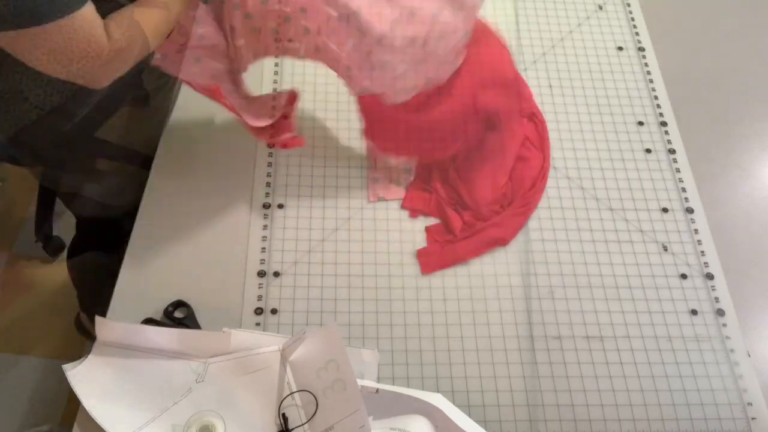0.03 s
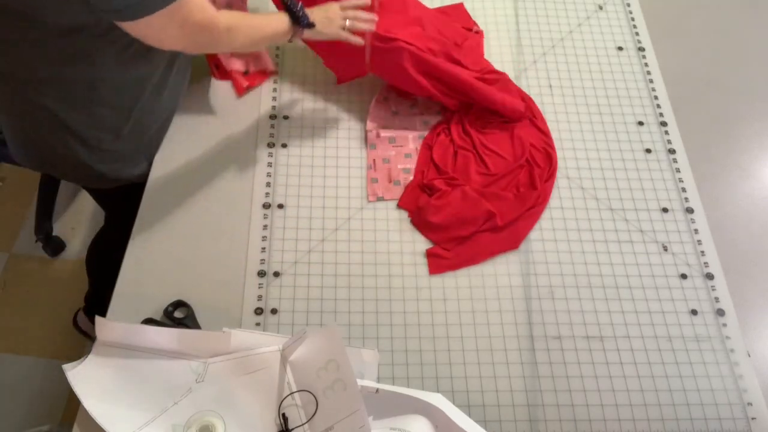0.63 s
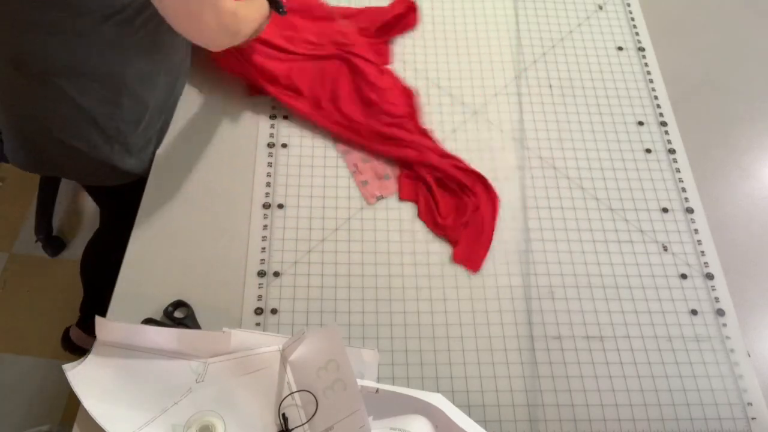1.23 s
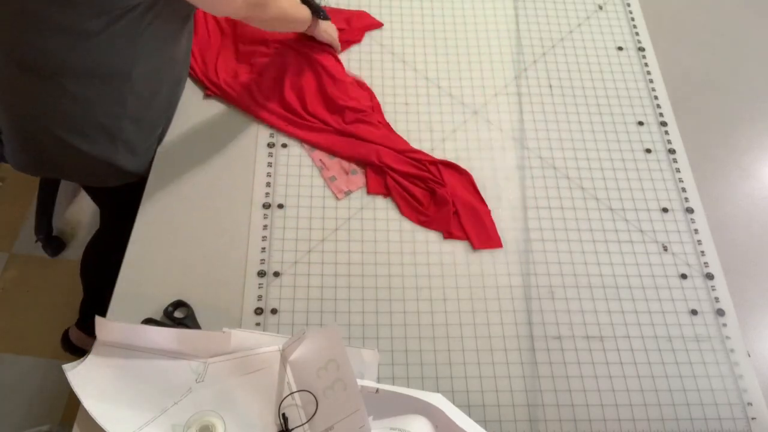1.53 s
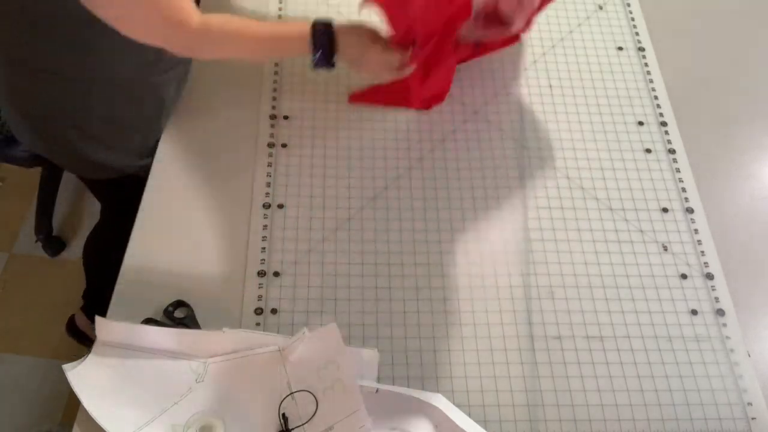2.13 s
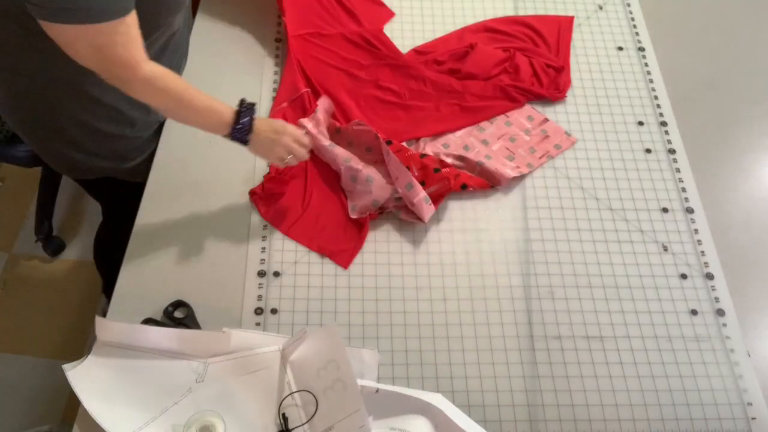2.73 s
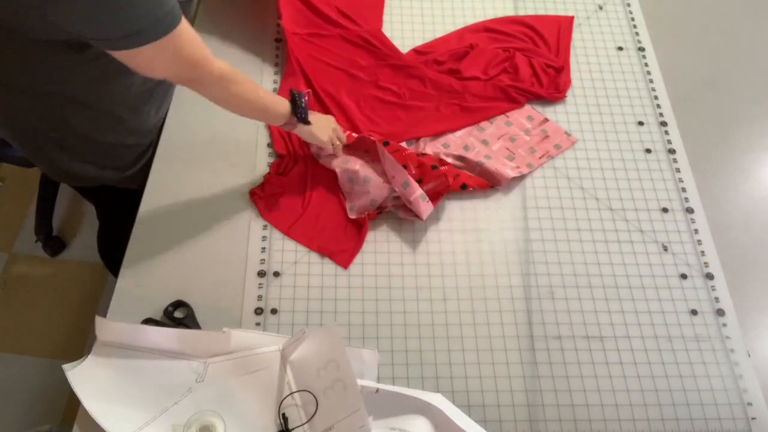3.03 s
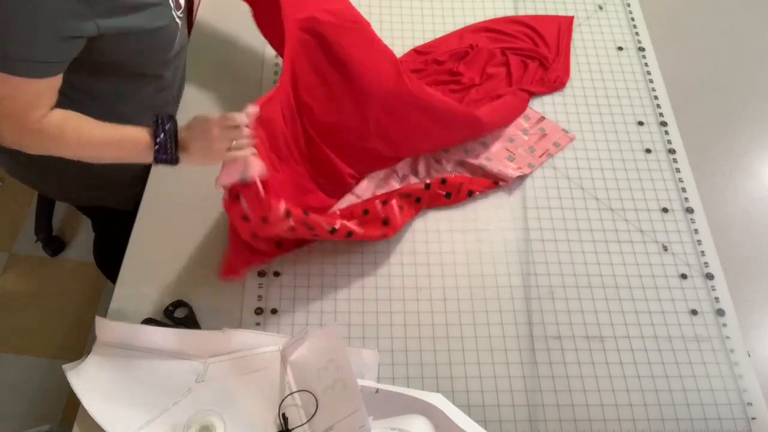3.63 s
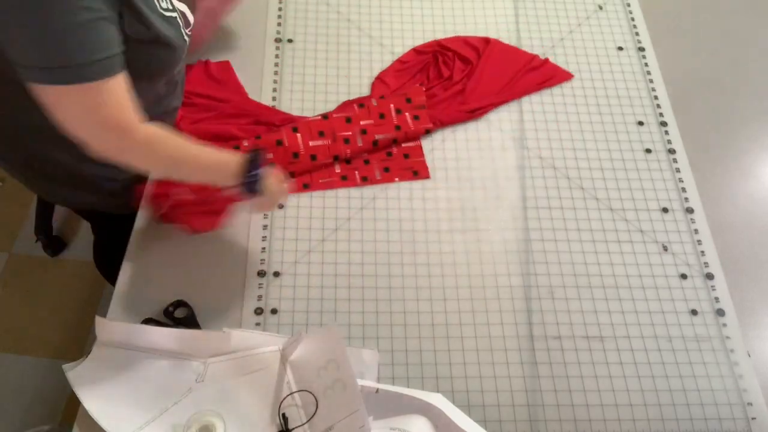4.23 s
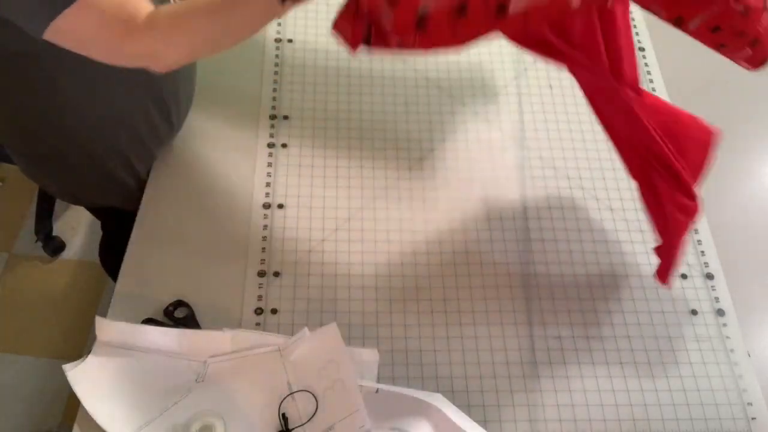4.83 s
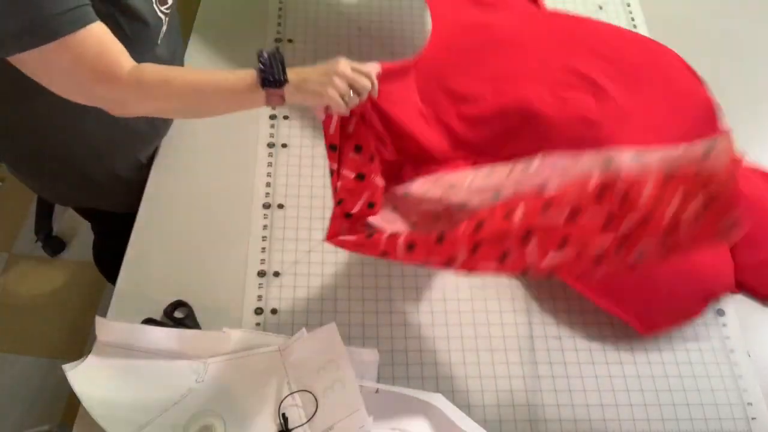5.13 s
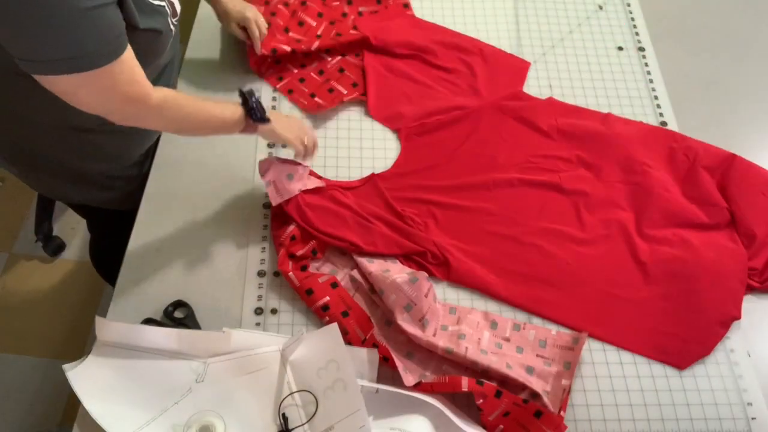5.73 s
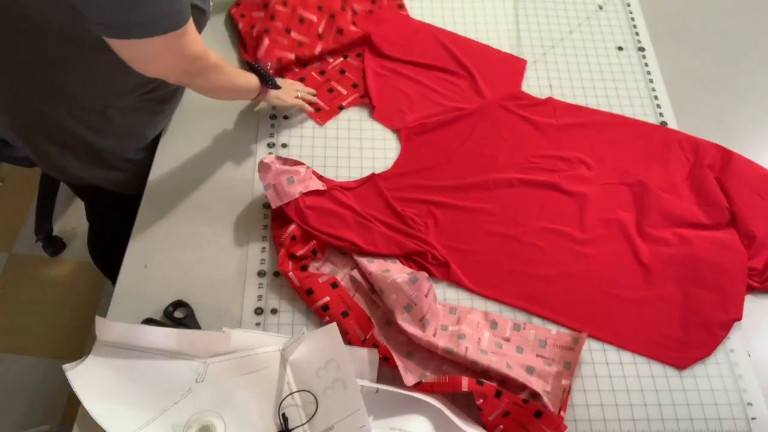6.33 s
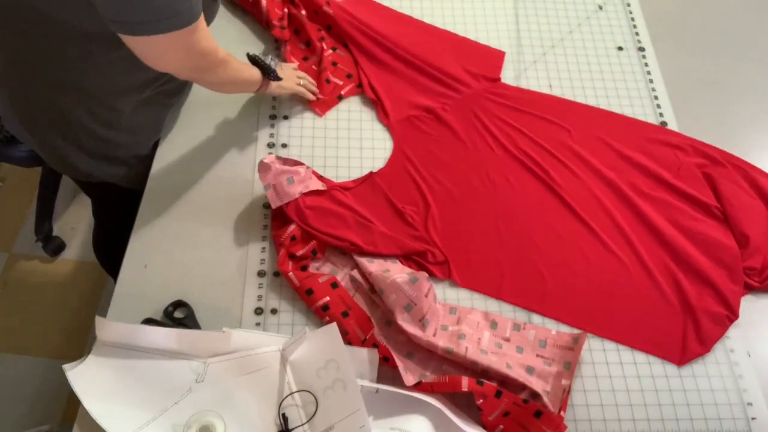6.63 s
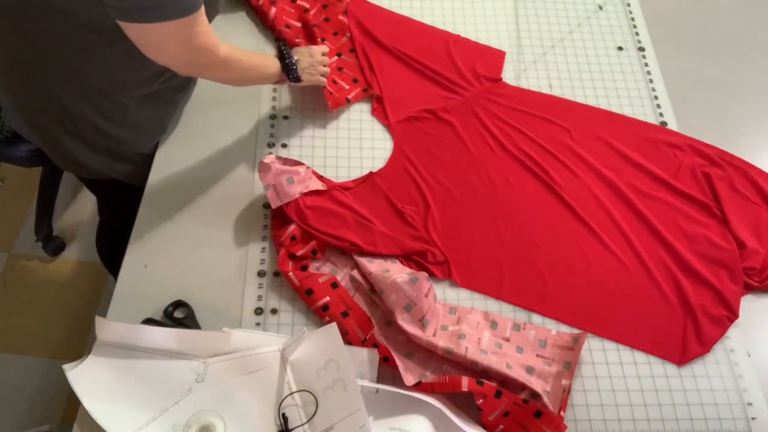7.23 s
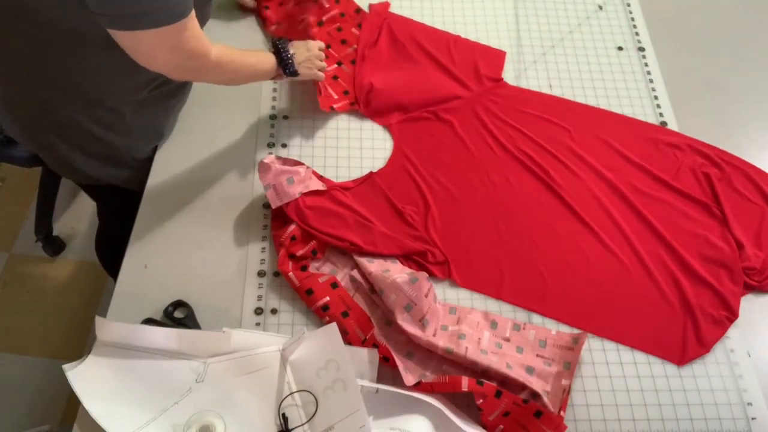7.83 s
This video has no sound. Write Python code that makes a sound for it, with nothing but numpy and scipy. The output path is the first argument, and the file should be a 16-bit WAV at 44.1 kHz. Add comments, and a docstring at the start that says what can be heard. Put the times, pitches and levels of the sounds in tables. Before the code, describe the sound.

Soft fabric is dragged over a table, shaken out with whip-like snaps and smoothed by hand, with light knocks over a low room hum.

```python
"""In a small humming workroom, a soft dress is dragged over a cutting table, lifted, shaken out twice
and smoothed by hand. Fingers scuff the mat and knock the table top, and the walls answer softly.
The weave hisses as its threads catch and slip, loose folds flutter and slap, and the hem cracks
like a whip when it is pulled tight. The moving air pushes on one close microphone."""
import sys
import numpy as np
from scipy import signal
from scipy.fft import rfft, irfft, next_fast_len
from scipy.io import wavfile
from scipy.ndimage import map_coordinates

SR = 44100
rng = np.random.default_rng(int(sys.argv[2]) if len(sys.argv) > 2 else 0)


def inscribe(sig):
    """Save sig as 16-bit PCM at rate SR to the path in sys.argv[1].

    A 1-D sig is mono; a 2-D sig holds one channel per row.
    Samples are clipped to [-1, 1] before scaling.
    """
    pcm = np.round(np.clip(np.atleast_2d(sig).T, -1, 1) * 32767)
    wavfile.write(sys.argv[1], SR, pcm.astype(np.int16))


N = 348390  # 7.9 s
TOP_HZ = 15850


def amp(db):
    """Turn decibels into a gain to multiply by."""
    return 10 ** (np.asarray(db) / 20)


def unit(x):
    """Scale a sound to an average (rms) size of 1."""
    return x / np.sqrt(np.mean(x ** 2) + 1e-20)


def along(points, hz):
    """Read between (f/Hz, value) points, spaced as musical pitch."""
    f, values = np.transpose(points)
    return np.interp(np.log(hz + 1), np.log(f + 1), values)


def wobble(rate):
    """A smooth random curve through rate points a second."""
    points = rng.standard_normal(int(N * rate / SR) + 4)
    return map_coordinates(points, [np.arange(N) * rate / SR])


def filtered(x, response):
    """Multiply each frequency in x by response(hz)."""
    size = next_fast_len(len(x) + 8192)
    return irfft(rfft(x, size) * response(np.fft.rfftfreq(size, 1 / SR)), size)[:len(x)]


def coloured(x, spectrum):
    """Give x a tone colour from (f/Hz, level/dB) points, at an average size of 1."""
    return unit(filtered(x, lambda hz: amp(along(spectrum, hz))))


def band(hz, centre_hz, octaves):
    """A bell-shaped filter that keeps the pitches near centre_hz."""
    return np.exp(-.5 * (np.log2((hz + 1) / centre_hz) / octaves) ** 2)


def resonances(modes, hz):
    """A filter for something that rings at the given (f/Hz, width/Hz, level/dB) rows."""
    return sum(amp(db) * 1j * hz * width / (centre ** 2 - hz ** 2 + 1j * hz * width)
               for centre, width, db in modes)


def slips(size, rate, spread_db, smooth):
    """Tiny uneven clicks, about rate a second, mixed with a share of smooth hiss."""
    chance, strength, sign = rng.random(size), rng.standard_normal(size), rng.standard_normal(size)
    clicks = (chance < rate / SR) * np.sign(sign) * amp(spread_db * np.clip(strength, -2, 2))
    return unit(unit(clicks) + smooth * rng.standard_normal(size))


def fade(t, t60):
    """Die away by 60 dB in t60 seconds, the "fade" time in the tables."""
    return np.exp(-np.log(1000) * t / t60)


def burst(t, rise, t60):
    """Swell quickly to a peak of 1, then die away."""
    shape = (1 - np.exp(-t / rise)) * fade(t, t60)
    return shape / shape.max()


def moves(rows, skew=0.67, speed_power=1.08):
    """One gain curve per level column: the faster the arm moves, the louder the cloth."""
    start, length, *levels = np.transpose(rows)[:, :, None]
    progress = np.clip((np.arange(N) / SR - start) / length, 0, 1)
    speed = np.abs(np.sin(np.pi * progress ** skew))  # fastest before the middle of the move
    return [np.linalg.norm(amp(db) * speed ** speed_power, axis=0) for db in levels]


# Tone colours of the ventilation and of a bright hiss (also used for the weave): f/Hz, level/dB
VENT_COLOUR = [(20, 5.5), (42, 3.5), (75, -13.5), (130, -16.5), (260, -25.5), (450, -28), (680, -30),
               (850, -38.5), (1500, -37), (7000, -48), (10000, -54), (15800, -52)]
HISS_COLOUR = [(1500, -18), (3200, 0.5), (4500, 1.5), (5700, 1), (7300, 2.5), (10500, -0.5), (12500, -4),
               (15800, -12)]
def ventilation(hum_db=-48.5, hiss_db=-76):
    """Ventilation makes a steady low hum of noise, with a faint hiss on top."""
    hum = amp(hum_db) * coloured(rng.standard_normal(N), VENT_COLOUR)
    return hum + amp(hiss_db) * coloured(rng.standard_normal(N), HISS_COLOUR)


# How long the room echoes: f/Hz, fade/s
ECHO_FADES = [(150, 0.34), (1000, 0.47), (5000, 0.31), (14000, 0.41)]
def wall_echo(x):
    """Sound bounces between the walls, and each frequency dies at its own speed."""
    hz, t, noise = signal.stft(rng.standard_normal(SR // 2), SR, nperseg=256)
    tail = signal.istft(noise * fade(t, along(ECHO_FADES, hz)[:, None]), SR, nperseg=256)[1]
    tail = np.pad(tail, (SR // 200, 0))  # arrives 5 ms late
    return signal.fftconvolve(x, tail / np.linalg.norm(tail))[:N]


# Swings of loose cloth (they also drive the flutter): t/s, length/s, flutter level/dB, air level/dB
CLOTH_SWINGS = [(-.08, 0.35, -54, -41.5), (.13, 0.45, -58, -44), (.5, 1.34, -65.5, -54),
                (1.49, 0.56, -56.5, -47), (2.15, 0.463, -51, -34.5), (2.92, 0.95, -61, -42),
                (3.36, 0.67, -57, -37), (3.88, 0.53, -56.5, -43), (4.2, 0.37, -45.5, -28.5),
                (4.48, 0.43, -54, -35.5), (4.82, 0.72, -60.5, -41), (5.28, 0.47, -59, -33),
                (5.6, 0.64, -79, -39.5), (6.05, 0.56, -66, -48.5), (6.55, 0.98, -63.5, -48),
                (7.3, 0.53, -62.5, -48.5), (7.8, .3, -51, -42.5)]
# Tone colour of air hitting the microphone: f/Hz, level/dB
AIR_COLOUR = [(2, 21), (8, 11), (20, 0), (40, -14.5), (65, -8.5), (100, -28), (200, -27.5), (600, -82)]
def draught(boost_db=7):
    """Each swing of the cloth blows air on the microphone, making a deep rumble."""
    _, air_gain = moves(CLOTH_SWINGS)
    return air_gain * amp(boost_db) * coloured(rng.standard_normal(N), AIR_COLOUR)


# Air shoved aside by the cloth: t/s, peak level/dB, half-width/s
AIR_PUSHES = [(2.34, -26.5, 0.0056), (4.315, -46, 0.0067), (5.22, -22.5, 0.0026), (5.24, -18.5, 0.011),
              (5.496, -36, 0.0024), (6.074, -46, 0.002)]
def air_pushes():
    """A broad piece of cloth passing close by pushes air ahead and sucks it back behind."""
    t = np.arange(N) / SR
    return sum(amp(db) * (s - t) / width * np.exp(.5 - .5 * ((t - s) / width) ** 2)
               for s, db, width in AIR_PUSHES)


# Hands and hips bumping the table: t/s, level/dB, hardness/Hz
TABLE_KNOCKS = [(1.483, -46.5, 500), (1.506, -41.5, 200), (1.536, -57, 120), (3.213, -58.5, 900),
                (6.063, -43, 600), (7.343, -55, 900), (7.832, -33.5, 264), (7.858, -59, 250)]
# Notes the table top rings at: f/Hz, level/dB, fade/s
TABLE_NOTES = [(68.3, 3.5, 0.66), (113.5, 0.5, 0.14), (151, -5, 0.1), (237.6, -2, 0.11), (289, -4, 0.06),
               (367, -3, 0.13), (623, -13.5, 0.43), (803, -7, 0.2)]
def table_knocks(contact_s=0.0025):
    """Bumps make the table top ring; the softer the bump, the weaker its high notes."""
    out, t = np.zeros(N), np.arange(SR // 2) / SR
    hz, note_db, t60 = np.transpose(TABLE_NOTES)[:, :, None]
    for s, db, hard_hz in TABLE_KNOCKS:
        strength = amp(db + note_db + rng.standard_normal(hz.shape)) / np.hypot(1, hz / hard_hz)
        notes = strength * np.sin(2 * np.pi * hz * t) * fade(t, t60)
        add(out, s, notes.sum(axis=0) * (1 - np.exp(-t / contact_s)))
    return out


def add(track, s, sound):
    """Mix a sound into the track, starting at s seconds."""
    part = track[max(round(s * SR), 0):][:len(sound)]
    part += sound[:len(part)]


# Light taps on the table: t/s, peak level/dB, f/Hz, fade/s
TABLE_TAPS = [(1.482, -49, 1600, 0.022), (1.483, -51, 1020, 0.01), (1.503, -59, 780, 0.076),
              (1.508, -42.5, 205, 0.1), (2.268, -41.5, 3800, 0.01), (2.3575, -43, 4300, 0.01),
              (3.214, -43.5, 410, 0.023), (3.475, -58, 2960, 0.026), (6.277, -46, 10000, .014),
              (7.227, -44, 9350, .025)]
def table_taps(octaves=0.13):
    """Stiff seams and fingertips tap the table, each ringing briefly at its own pitch."""
    out, t = np.zeros(N), np.arange(SR // 10) / SR
    for s, db, centre_hz, t60 in TABLE_TAPS:
        ring = filtered(rng.standard_normal(len(t)), lambda hz: band(hz, centre_hz, octaves))
        tap = burst(t, rise=0.00024, t60=t60) * ring
        add(out, s, amp(db) * tap / np.abs(tap).max())
    return out


# Fingers pressing cloth along the mat: t/s, level/dB, length/s, pitch ratio
FINGER_SCUFFS = [(2.513, -55, 0.026, 1), (5.481, -51, 0.021, 1.26), (6.059, -50, 0.057, 0.97),
                 (6.089, -51.5, 0.069, 0.75), (6.554, -52, 0.016, 0.71), (6.57, -43.5, 0.047, 0.98),
                 (6.611, -48, 0.043, 0.88)]
# How the mat rings under a finger: f/Hz, width/Hz, level/dB
MAT_UNDER_FINGER = [(583, 79, 4.5), (1080, 120, 2), (1715, 360, 4), (1890, 280, -3.5), (2220, 280, 3),
                    (2850, 230, -18)]
def finger_scuffs(rise_s=0.0026, sag_db=5, muffle_hz=3500):
    """Pressed fingers stick and slip, which makes the mat ring."""
    out, t = np.zeros(N), np.arange(SR // 4) / SR
    for s, db, length, pitch in FINGER_SCUFFS:
        pressure = (1 - np.exp(-t / rise_s)) * amp(-sag_db * t / length) / (1 + (t / length) ** 8)
        catches = slips(len(t), rate=1500, spread_db=4, smooth=.5)
        mat = lambda hz: resonances(MAT_UNDER_FINGER, hz / pitch) / (1 + 1j * hz / muffle_hz)
        add(out, s, amp(db) * pressure * unit(filtered(catches, mat)))
    return out


# Short brushes of cloth and fingertips: t/s, level/dB, rise/s, fade/s, f/Hz
LIGHT_BRUSHES = [(.068, -52.5, .001, 0.024, 5000), (.211, -60, .002, 0.14, 6000),
                 (1.12, -61.5, .06, 0.44, 2800), (1.21, -62, .04, 0.32, 2400),
                 (2.2675, -57, .0006, .015, 4000), (2.329, -52, .0015, 0.12, 6960),
                 (2.356, -53.5, .0015, 0.025, 6000), (2.705, -66, .008, 0.15, 13000),
                 (2.788, -59.5, .01, .15, 6460), (3.28, -62.5, 0.011, 0.31, 7000),
                 (3.475, -56, .002, 0.025, 3200), (5.15, -60, .05, 0.56, 10000),
                 (5.246, -49, .0006, 0.032, 9300), (5.422, -52, .002, 0.015, 10930),
                 (5.471, -53.5, 0.0026, 0.051, 5940), (5.505, -52.5, .002, 0.02, 7000),
                 (6.152, -53, .002, .04, 8000), (6.344, -52.5, .03, 0.37, 9000),
                 (6.535, -43.5, 0.0027, 0.076, 5660), (6.778, -52, .001, .03, 9000),
                 (6.834, -55, .004, 0.088, 8000), (7.018, -49, .002, .04, 7900),
                 (7.047, -44, .001, 0.035, 6500), (7.181, -60, .001, 0.061, 3200),
                 (7.227, -50, 0.0026, 0.22, 5200), (7.229, -49.5, 0.0011, 0.061, 9500),
                 (7.626, -59.5, 0.0018, 0.066, 4950), (7.668, -56.5, 0.014, 0.18, 3300),
                 (7.867, -51, .002, 0.088, 7140)]
# How the mat rings under a brush or a flat hand: f/Hz, width/Hz, level/dB
MAT_UNDER_HAND = [(616, 63, -3.5), (1210, 170, -17), (1960, 270, -8.5), (2840, 470, -5), (3270, 200, -0.5),
                  (4480, 290, -31), (5600, 130, -28), (6860, 350, -8), (9700, 360, -16)]
def light_brushes(octaves=1.0, muffle_hz=12000):
    """A light touch makes threads slip in a short hiss, coloured by the mat."""
    out, t = np.zeros(N), np.arange(SR // 2) / SR
    mat = lambda hz: (1 + resonances(MAT_UNDER_HAND, hz)) / (1 + (hz / muffle_hz) ** 7)
    for s, db, rise, t60, centre_hz in LIGHT_BRUSHES:
        threads = slips(len(t), rate=5000, spread_db=2, smooth=1)
        hiss = filtered(threads, lambda hz: band(hz, centre_hz, octaves) * mat(hz))
        add(out, s, amp(db) * burst(t, rise, t60) * unit(hiss))
    return out


# Strokes of the flat hand: t/s, length/s, rub level/dB, hiss level/dB
HAND_STROKES = [(6.049, .09, -58, -64), (6.131, 0.13, -53, -53), (6.233, 0.089, -49, -51.5),
                (6.332, 0.23, -50, -50), (6.539, 0.11, -51, -60), (6.661, 0.17, -56, -57),
                (6.81, 0.11, -54.5, -54.5), (6.924, 0.17, -53.5, -53)]
# Tone colours of cloth's dull rub and crisp rustle (also used for sliding): f/Hz, level/dB
RUB_COLOUR = [(150, -4.5), (450, 1.5), (620, 3), (820, 3), (1300, 2.5), (2200, 0.5), (3300, -4.5),
              (4500, -10), (7000, -21), (12000, -51)]
RUSTLE_COLOUR = [(1500, -22), (3200, -8), (4400, 3.5), (6000, 1.5), (8200, 0), (10000, -2), (12500, -12.5),
                 (15800, -20)]
def smoothing_hand(grip_s=.012, sag_db_per_s=21, release_s=0.027, judder_db=0.46, catch_db=1.0):
    """The flat hand grips, eases off and lets go; the cloth catches under it and rings the mat."""
    start, length, *levels = np.transpose(HAND_STROKES)[:, :, None]
    t = np.maximum(np.arange(N) / SR - start, 0)
    letting_go = np.exp(-np.maximum(t - length, 0) / release_s)
    pressure = (1 - np.exp(-t / grip_s)) * amp(-sag_db_per_s * t) * letting_go
    rub_gain, hiss_gain = [np.linalg.norm(amp(db) * pressure, axis=0) for db in levels]
    rub = rub_gain * coloured(slips(N, rate=4000, spread_db=3, smooth=1.6), RUB_COLOUR)
    rustle = coloured(slips(N, rate=3700, spread_db=4.5, smooth=0.64), RUSTLE_COLOUR)
    hiss = hiss_gain * unit(amp(catch_db * wobble(160)) * rustle)
    judder = amp(judder_db * wobble(70) - 0.95)
    return filtered(judder * (rub + hiss), lambda hz: 1 + resonances(MAT_UNDER_HAND, hz))


# Pulls that drag the dress over the mat: t/s, length/s, rub level/dB, hiss level/dB
DRESS_DRAGS = [(-.18, 0.99, -64.5, -65), (.29, 0.37, -66, -69.5), (.53, 0.58, -66.5, -66.5),
               (.95, 0.27, -60, -58.5), (1.05, .38, -58.5, -65), (1.41, 0.2, -67.5, -71),
               (1.52, 0.56, -60.5, -63), (1.84, 0.59, -67, -67), (2.14, 0.49, -59.5, -66.5),
               (2.46, 0.21, -60.5, -65), (2.66, 0.55, -68, -68), (3.02, 0.51, -66, -67.5),
               (3.38, 0.7, -63, -62.5), (3.73, 0.48, -59, -59.5), (4.04, 0.74, -58.5, -59.5),
               (4.29, 0.27, -57, -62.5), (4.65, 0.58, -68.5, -63), (5.0, 0.28, -64.5, -65),
               (5.13, 0.58, -61.5, -62.5), (5.48, 0.45, -63.5, -64.5), (6.98, 0.47, -65, -73),
               (7.31, 0.47, -65.5, -66.5), (7.62, 0.82, -60, -65.5)]
def sliding_dress(uneven_db=0.74, crease_db=-12):
    """Threads catch and let go on the mat: a dull rub, a fine hiss, and creases that buckle."""
    rub_gain, hiss_gain = moves(DRESS_DRAGS)
    grip = amp(0.77 + 2.3 * wobble(50))
    rub = rub_gain * grip * coloured(slips(N, rate=2500, spread_db=4.0, smooth=1.64), RUB_COLOUR)
    weave = coloured(slips(N, rate=4000, spread_db=1, smooth=0.87), HISS_COLOUR)
    buckling = amp(5.6 * wobble(90))
    creases = amp(crease_db) * unit(buckling * coloured(rng.standard_normal(N), RUSTLE_COLOUR))
    return amp(uneven_db * wobble(25)) * (rub + hiss_gain * (weave + creases))


# Cloth filling with air: t/s, level/dB, half-width/s
CLOTH_BILLOWS = [(3.81, -55, 0.028), (4.445, -52, 0.0072), (4.645, -49.5, 0.02), (5.5, -53.5, 0.031)]
# Tone colour of tumbling folds: f/Hz, level/dB
FLUTTER_COLOUR = [(30, -28), (70, 3), (130, 3), (200, -1.5), (300, -4), (480, -7.5), (700, -10),
                  (950, -27.5), (1700, -37.5), (4000, -87), (12000, -44)]
def fluttering_folds(uneven_db=2.6):
    """Loose folds tumble in soft pats with each swing, and swell where the cloth fills with air."""
    swing_gain, _ = moves(CLOTH_SWINGS)
    t = np.arange(N) / SR
    billow_gain = sum(amp(db) * np.exp(-.5 * ((t - s) / width) ** 2) for s, db, width in CLOTH_BILLOWS)
    flicker = amp(1.23 + uneven_db * wobble(25))
    pats = coloured(slips(N, rate=600, spread_db=3, smooth=0.79), FLUTTER_COLOUR)
    return (swing_gain + billow_gain) * flicker * pats


# Folds slapping down: t/s, level/dB, fade/s, bass limit/Hz
FOLD_SLAPS = [(.002, -43.5, 0.1, 300), (0.03, -45.5, 0.24, 355), (0.204, -52.5, 0.098, 300),
              (1.742, -51.5, .09, 130), (2.242, -53, 0.02, 600), (2.251, -49, 0.035, 900),
              (2.2672, -44, 0.028, 700), (2.289, -49, 0.084, 1090), (2.416, -50.5, .025, 1200),
              (2.332, -45.5, 0.17, 229), (2.45, -47.5, 0.046, 250), (2.479, -55, 0.022, 900),
              (3.5895, -50, 0.021, 550), (4.243, -53, 0.08, 130), (4.324, -41.5, 0.44, 248),
              (5.2161, -30.5, 0.077, 70.4), (5.24, -37.5, 0.21, 40), (5.254, -48.5, 0.17, 700),
              (5.418, -42.5, 0.027, 200), (7.341, -55.5, 0.39, 330), (7.787, -50, 0.053, 746),
              (7.836, -48.5, 0.076, 640)]
# Tone colour of a slap: f/Hz, level/dB
SLAP_COLOUR = [(25, -10), (60, -2), (130, 5), (300, -3), (600, -9.5), (1000, -15), (1800, -23),
               (3000, -30.5), (5000, -31.5), (14000, -53.5)]
def slapping_folds(rise_share=0.018):
    """A fold lands as a quick run of dull pats; the smaller the fold, the less bass it makes."""
    out, t = np.zeros(N), np.arange(SR // 3) / SR
    for s, db, t60, low_hz in FOLD_SLAPS:
        pats = slips(len(t), rate=2000, spread_db=1.5, smooth=0.7)
        pats = filtered(pats, lambda hz: hz ** 2 / (hz ** 2 + low_hz ** 2))
        landing = burst(t, rise_share * t60, t60)  # a big fold is slower to land and to settle
        add(out, s, amp(db) * landing * coloured(pats, SLAP_COLOUR))
    return out


# The hem pulled tight: t/s, level/dB, build-up/s, sharpness/Hz
HEM_SNAPS = [(4.3204, -20.5, 0.0018, 5130), (5.2199, -28, 0.0012, 900), (5.2274, -28.5, 0.0004, 1600)]
# How the tight hem rings: f/Hz, width/Hz, level/dB
HEM_RING = [(493, 240, 1.5), (1840, 280, 4.5), (2760, 690, 7.5), (3480, 170, 14), (6630, 1500, 11.5),
            (11000, 1500, 11)]
def snapping_hem(rebound=0.25, release_s=0.00037):
    """Suction builds as the hem whips round, then flips to a push; the tight hem rings briefly."""
    out, t = np.zeros(N), np.arange(SR // 100) / SR
    for s, db, build_s, sharp_hz in HEM_SNAPS:
        suction = -np.exp(-t / build_s)[::-1]
        push = rebound * np.exp(-t / release_s)
        crack = filtered(np.concatenate([suction, push]), lambda hz: 1 / (1 + 1j * hz / sharp_hz))
        add(out, s - len(t) / SR, amp(db) * crack)  # the flip lands at time s
    return filtered(out, lambda hz: 1 + resonances(HEM_RING, hz))


def scene(echo_db=-13.5):
    """Mix the dress, hands and table with their echo, the moving air and the ventilation."""
    dress = sliding_dress() + fluttering_folds() + slapping_folds() + snapping_hem()
    touches = table_taps() + light_brushes() + smoothing_hand() + finger_scuffs() + table_knocks()
    near = dress + touches
    background = ventilation() + amp(echo_db) * wall_echo(near)
    return (background + draught() + air_pushes() + near)[None]


def record(dry):
    """Cut away all treble above TOP_HZ."""
    return np.array([filtered(channel, lambda hz: hz < TOP_HZ) for channel in dry])


dry = scene()
out = record(dry)
inscribe(out)
```